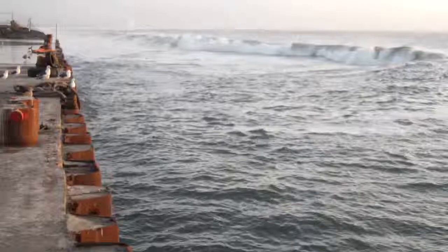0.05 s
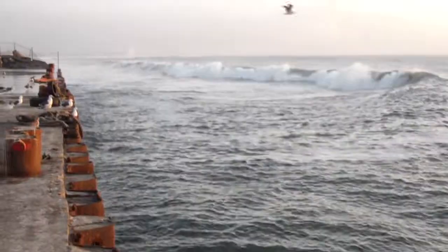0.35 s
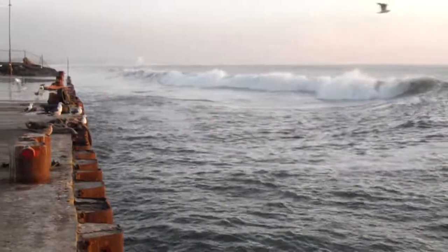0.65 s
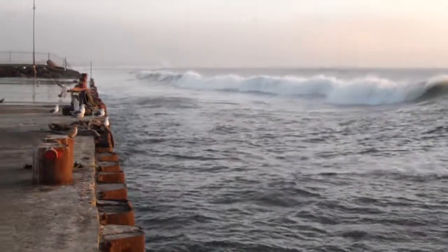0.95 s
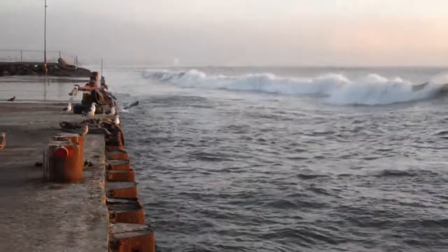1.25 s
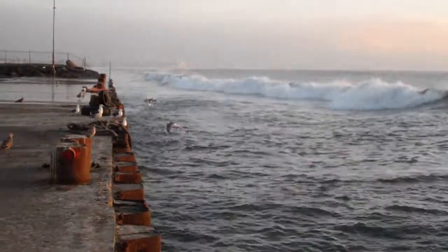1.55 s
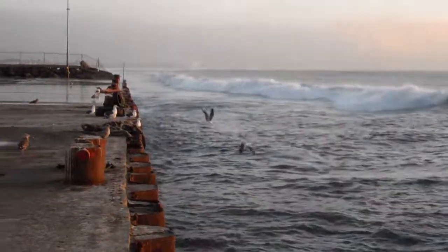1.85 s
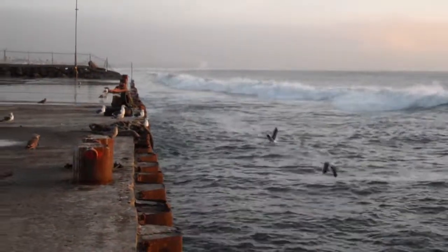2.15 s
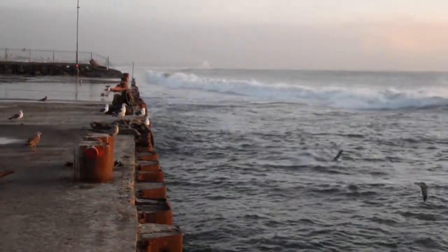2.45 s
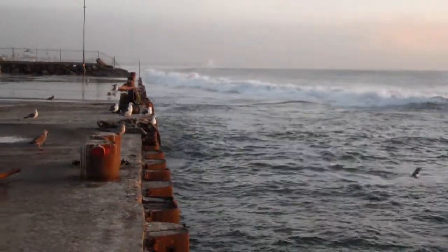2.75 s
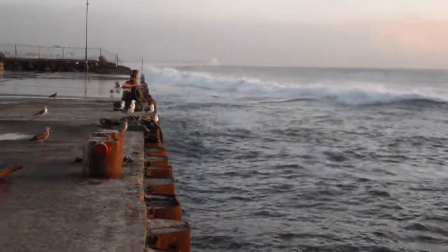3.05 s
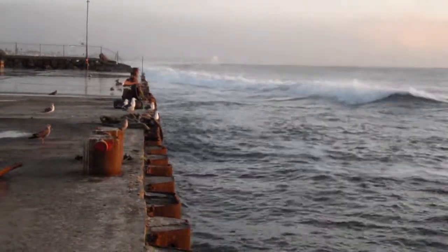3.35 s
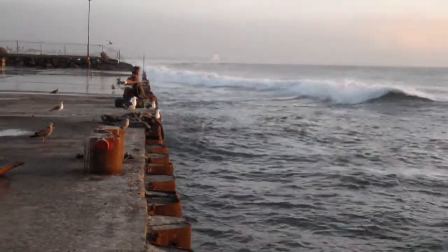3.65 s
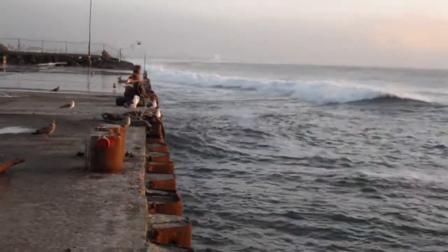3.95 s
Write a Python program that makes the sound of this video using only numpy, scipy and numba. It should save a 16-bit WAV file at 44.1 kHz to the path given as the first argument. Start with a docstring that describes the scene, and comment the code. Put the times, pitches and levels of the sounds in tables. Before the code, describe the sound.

Strong wind hits the microphone in quick, irregular gusts, rumbling and crackling on the right and duller on the left. Distant surf washes continuously underneath, heard from an open pier.

```python
"""A pier over a rough sea, with gusty wind buffeting a two-port microphone.
Distant breakers and foam merge into one wide wash. The sheltered left port mostly rumbles.
The wind hits the right port hard: eddies thump, its hollow booms,
and in strong gusts the flow tears into a crackle and a rasp."""
import sys
import numpy as np
from scipy import signal
from scipy.fft import rfft, irfft
from scipy.io import wavfile
from scipy.ndimage import uniform_filter1d, minimum_filter1d
from numba import njit

SR = 44100
rng = np.random.default_rng(int(sys.argv[2]) if len(sys.argv) > 2 else 0)


def waveform_to_disk(signal):
    """Save audio, clipped to [-1, 1], as 16-bit WAV at the path in sys.argv[1]."""
    frames = np.transpose(np.atleast_2d(signal))
    scaled = np.clip(frames, -1, 1) * 32767
    samples = np.round(scaled).astype(np.int16)
    wavfile.write(sys.argv[1], SR, samples)


N = 176400

# Sea wash. Each row: time in seconds, relative level in dB.
SEA_LEVEL_DB = [(0.12, -53), (0.16, -54.5), (0.34, -53.5), (0.5, -55), (0.6, -58), (1.25, -54.5),
                (1.33, -52.5), (1.53, -51.5), (1.65, -50.5), (1.88, -52.5), (1.96, -52.5), (2.03, -56.5),
                (2.2, -54.5), (2.42, -51.5), (2.63, -53), (2.81, -52.5), (2.86, -56.5), (3.0, -58),
                (3.34, -59), (3.55, -55.5), (3.93, -53.5), (4.0, -50.5)]
# Sea spectrum and its lift at the right port. Each row: frequency in Hz, gain in dB.
SEA_SPECTRUM_DB = [(40, 12.5), (200, 6.5), (500, 0), (750, 4), (1200, -1.5), (2200, -3), (3500, -5),
                   (5000, -8.5), (6200, -10), (7200, -14.5), (8600, -20), (9700, -28.5), (11500, -39)]
SEA_RIGHT_LIFT_DB = [(200, 0.86), (1000, 5.5), (2200, 6.5), (3500, 9.28), (4600, 7.48), (6400, -1),
                     (8000, 1.66), (11000, -1)]
# Sea likeness between ports. Each row: frequency in Hz, coherence from 0 to 1.
SEA_COHERENCE = [(100, 1), (2000, 0.93), (4000, 0.89), (6000, 0.67), (9000, 0.48)]
# Wind on the left port. Each row: time in seconds, relative level in dB.
LEE_GUST_DB = [(0.12, -33), (0.195, -43), (0.36, -24.5), (0.495, -27.5), (0.525, -18.5), (0.585, -39),
               (0.69, -27.5), (0.765, -38), (0.81, -25.5), (0.945, -37), (1.005, -23), (1.02, -31),
               (1.14, -23), (1.185, -30), (1.365, -35), (1.395, -49), (1.56, -26.5), (1.8, -42),
               (2.01, -30), (2.055, -60), (2.1, -30), (2.145, -40), (2.295, -35.5), (2.52, -32),
               (2.61, -50), (2.685, -27), (2.745, -37.0), (2.865, -30), (3.105, -41), (3.27, -25),
               (3.285, -38.5), (3.675, -34.5), (3.72, -44), (3.995, -37.5)]
# Gusts, deep rumble and tearing treble on the right port. Each row: time in seconds, relative level in dB.
GUST_DB = [(0.12, -22.5), (0.405, -17.5), (0.422, -27), (0.46, -19.5), (0.525, -17), (0.555, -20),
           (0.6, -19), (0.645, -16.5), (0.765, -21.5), (0.885, -17.5), (0.96, -25.5), (0.98, -18),
           (1.155, -19), (1.185, -22.5), (1.235, -26), (1.285, -30), (1.305, -18), (1.335, -23.5),
           (1.365, -14.5), (1.39, -24.5), (1.43, -21), (1.485, -31.5), (1.53, -35.5), (1.548, -21),
           (1.59, -25), (1.625, -32), (1.665, -16.5), (1.7, -16.5), (1.72, -30), (1.785, -32),
           (1.815, -17.5), (1.83, -22.5), (1.845, -40.5), (1.915, -36.5), (1.935, -22), (1.98, -14.5),
           (2.01, -18.5), (2.03, -21), (2.045, -32), (2.075, -31), (2.1, -22.5), (2.175, -33),
           (2.19, -28.5), (2.325, -28), (2.34, -20.5), (2.38, -18.5), (2.405, -32.5), (2.44, -34),
           (2.495, -21.5), (2.525, -29.5), (2.605, -24), (2.65, -33), (2.795, -28), (2.83, -15.5),
           (2.895, -24.5), (2.93, -24.5), (2.98, -18), (3.0, -23.5), (3.06, -28.5), (3.075, -20.5),
           (3.145, -26), (3.175, -19.5), (3.195, -22), (3.225, -17), (3.28, -22), (3.31, -23.5),
           (3.36, -17.5), (3.41, -24), (3.445, -21), (3.53, -17.5), (3.572, -35.5), (3.583, -24),
           (3.603, -26.5), (3.612, -37), (3.625, -27), (3.655, -28.5), (3.667, -39.5), (3.695, -36.5),
           (3.735, -21), (3.81, -19.5), (3.855, -21.5), (3.955, -21.5), (3.99, -19)]
RUMBLE_LEVEL_DB = [(0.12, -37), (0.36, -40), (1.32, -29.5), (1.365, -22.5), (1.485, -31), (2.145, -24.5),
                   (2.265, -42), (2.415, -26.5), (2.46, -37), (2.61, -24), (2.685, -34), (3.135, -22),
                   (3.405, -34.5), (3.995, -24.5)]
TEAR_DB = [(0.12, -12.5), (0.54, -12.5), (0.8, -9.5), (1.035, -8), (1.16, -9.5), (1.19, -15.5), (1.3, -12),
           (1.67, -14.5), (1.77, -26), (1.875, -7.5), (1.92, -16.5), (2.37, -17.5), (2.7, -15), (2.79, -18),
           (2.895, -13.5), (2.98, -16.5), (3.1, -20.5), (3.17, -25.5), (3.3, -14), (3.42, -22.5),
           (3.535, -14.5), (3.59, -18), (3.65, -7), (3.75, -22), (3.9, -18), (3.995, -31.5)]
# Spectra of the wind layers. Each row: frequency in Hz, relative density in dB.
LEE_SPECTRUM_DB = [(15, -8.5), (45, 5.5), (90, 5), (160, 2.5), (280, -7), (500, -10.5), (900, -32.5),
                   (2000, -48.5), (5000, -64)]
RUMBLE_SPECTRUM_DB = [(12, -8), (30, -5.5), (55, 1), (100, 9.5), (170, 10), (350, -24), (1000, -70)]
BUFFET_SPECTRUM_DB = [(20, -22), (60, -8.5), (120, -4), (190, 1.5), (290, -2.5), (430, -3.5), (600, -8.5),
                      (850, -15.5), (1400, -23.5), (2500, -53), (5000, -81)]
CRACKLE_SPECTRUM_DB = [(100, -7.5), (400, 4.5), (800, 5), (1200, 3), (1700, 1.5), (2300, -6.5), (3000, -16),
                       (4500, -28.5), (8000, -86.5)]
RASP_SPECTRUM_DB = [(500, -27.5), (1100, -3), (1800, 3), (2400, 0.5), (3000, -8.5), (5000, -51)]
# Resonance of the right port's hollow. Each row: time in seconds, pitch in Hz, width per stage in Hz.
HOLLOW_HZ = [(0.12, 356, 200), (0.3, 291, 242), (0.52, 303, 109), (0.72, 321, 150), (0.88, 379, 238),
             (1.07, 331, 160), (1.16, 234, 139.6), (1.37, 265, 130), (1.57, 323, 220), (1.82, 235, 179),
             (2.0, 213, 199), (2.25, 219, 240), (2.37, 359, 110), (2.5, 250, 198), (2.83, 327, 218),
             (2.97, 220, 160), (3.16, 188, 90), (3.24, 267, 70), (3.39, 315, 129.5), (3.55, 249, 202),
             (3.8, 225, 180), (3.92, 253, 180), (3.99, 266, 50.3)]
# Big eddies on the right port. Each row: centre time in seconds, thump gain in dB, rip level in dB.
SLAP_EVENTS = [(0.390, -4, -28), (0.52, -3, -32), (0.838, -7.5, -27), (1.073, -8, -20), (1.353, -5, -25),
               (1.365, -6, -18.5), (1.448, -22, -23), (1.666, -7, -28), (1.829, -25, -24.5),
               (1.988, -26, -26), (2.09, -9, -37), (2.823, -2.5, -25), (2.955, -10, -28), (2.981, -7, -25),
               (3.071, -6, -31), (3.181, -6, -37), (3.447, -6, -26.5), (3.814, -4, -29)]

SEA_DB, SEA_PATCH_DB, SEA_FLICKER_DB = 12, 0.6, 0.56
LEE_DB, LEE_FLUTTER_DB = -4, -2
LEE_REF_DB, LEE_BUFFET_DB, LEE_GROWTH = -19.5, -16, 1.5
RUMBLE_DB, RUMBLE_SWELL_DB = -1.5, 1
GUST_REF_DB, TEAR_REF_DB = -27.5, -13.5
FLUTTER_HZ, GRAIN_HZ = 72, 350
HOLLOW_DB, HOLLOW_STEADINESS, LOCK_DB_PER_HZ, WIDTH_REF_HZ = -2, 0.69, 0.01, 197
EDDIES_PER_S, EDDY_S, EDDY_DB = 23, 0.00065, 4.5
SLAP_S, RIP_S = 0.00067, 0.0029
CRACKLE_DB, CRACKLE_FLUTTER_DB, CRACKLE_GRAIN_DB, CRACKLE_GROWTH = 2, 5.5, 7, 1.008
SPURT_LOSS_PER_DB = .04
RASP_DB, RASP_GROWTH, RASP_FLUTTER_DB = -23.5, 1.4, 3.5
BUFFET_DB, BUFFET_FLUTTER_DB = 1, 2.6
START_S, CEILING, CUTOFF_HZ = .108, .75, 11900


def amp(db):
    """Decibels to gain."""
    return 10 ** (np.asarray(db) / 20)


def unit(x):
    """Scales to rms 1."""
    return x / np.sqrt(np.mean(x ** 2) + 1e-20)


def at_hz(rows, hz):
    """Reads a spectrum on a log-frequency axis."""
    row_hz, value = np.transpose(rows)
    return np.interp(np.log(hz + 1), np.log(row_hz + 1), value)


def curve(rows, column=-1):
    """Reads one column of a time table at every sample."""
    rows = np.asarray(rows)
    return np.interp(np.arange(N) / SR, rows[:, 0], rows[:, column])


def wander(low_hz, high_hz):
    """Random motion between two rates, soft-limited to +-2."""
    hz = np.fft.rfftfreq(N, 1 / SR)
    band = hz / (hz + low_hz) / (1 + (hz / high_hz) ** 2)
    motion = unit(irfft(rfft(rng.standard_normal(N)) * band, N))
    return 2 * np.tanh(motion / 2)


def sea():
    """Distant breakers and foam: a wash with drifting patches, much alike at both ports."""
    frames, hz = N // 256 + 5, np.fft.rfftfreq(1024, 1 / SR)
    left_re, left_im, own_re, own_im, patches = rng.standard_normal((frames, 513, 5)).T
    patches = uniform_filter1d(patches, size=16, axis=0)  # across frequency
    patches = unit(uniform_filter1d(patches, size=14, axis=1))  # across time
    coherence = np.clip(at_hz(SEA_COHERENCE, hz), 0, 1)[:, None]
    left = left_re + 1j * left_im
    right = coherence * left + np.sqrt(1 - coherence ** 2) * (own_re + 1j * own_im)
    right *= amp(at_hz(SEA_RIGHT_LIFT_DB, hz))[:, None]
    spectra = np.array([left, right]) * amp(at_hz(SEA_SPECTRUM_DB, hz)[:, None] + SEA_PATCH_DB * patches)
    wash = signal.istft(spectra, nperseg=1024, noverlap=768)[1][:, :N]
    level_db = SEA_DB + curve(SEA_LEVEL_DB) + SEA_FLICKER_DB * wander(4.6, 60)
    return wash / wash[0].std() * amp(level_db)


def turbulence(spectrum_db, flutter_db):
    """Pressure noise in spurts, coloured by the port, at rms 1."""
    spurts = rng.standard_normal(N) * amp(flutter_db)
    colour = amp(at_hz(spectrum_db, np.fft.rfftfreq(N, 1 / SR)))
    return unit(irfft(rfft(spurts) * colour, N))


def leeward_wind():
    """Dull rumble on the sheltered port; buffeting grows in its strongest gusts."""
    gust_db, flutter_db = curve(LEE_GUST_DB), LEE_FLUTTER_DB * wander(10, FLUTTER_HZ)
    buffet_db = LEE_REF_DB + LEE_GROWTH * (gust_db - LEE_REF_DB) + LEE_BUFFET_DB
    dull = amp(gust_db + LEE_DB) * turbulence(LEE_SPECTRUM_DB, flutter_db)
    return dull + amp(buffet_db) * turbulence(BUFFET_SPECTRUM_DB, flutter_db)


def rumble():
    """Deep, slowly swelling turbulence on the right port."""
    swell_db = RUMBLE_SWELL_DB * wander(2, 9.1)
    return amp(curve(RUMBLE_LEVEL_DB) + RUMBLE_DB) * turbulence(RUMBLE_SPECTRUM_DB, swell_db)


@njit
def smooth(x, memory):
    """One-pole low-pass with time-varying memory."""
    out = np.zeros_like(x)
    for i in range(1, len(x)):
        out[i] = memory[i] * out[i - 1] + (1 - memory[i]) * x[i]
    return out


def resonate(x, pitch_hz, width_hz):
    """Resonator with moving pitch and width."""
    carrier = np.exp(2j * np.pi * np.cumsum(pitch_hz) / SR)
    return 2 * (carrier * smooth(x / carrier, np.exp(-np.pi * width_hz / SR))).real


def hollow():
    """The port's hollow booms; where the flow locks on, the boom is narrower and fuller."""
    pitch_hz, width_hz = curve(HOLLOW_HZ, column=1), np.maximum(curve(HOLLOW_HZ), 20)
    first_stage = resonate(rng.standard_normal(N), pitch_hz, width_hz)
    boom = unit(resonate(first_stage, pitch_hz, width_hz) / np.sqrt(width_hz))
    envelope = abs(signal.hilbert(boom))
    steadied = unit(boom / (envelope + 0.056) ** HOLLOW_STEADINESS)
    return steadied * amp(LOCK_DB_PER_HZ * (WIDTH_REF_HZ - width_hz))


def vortex(u):
    """Pressure of a passing vortex: a quick push, then suction. u is time over its time scale."""
    return -(u + .5 * (1 - u ** 2)) * np.exp(-u ** 2 / 2)


def eddies():
    """Small vortices cross the port at random."""
    out, t = np.zeros(N), np.arange(N) / SR
    for position, size, strength in rng.random((int(EDDIES_PER_S * N / SR), 3)):
        near = slice(int(position * N), int(position * N) + SR // 50)
        offset_s = t[near] - position * N / SR - .01
        out[near] += (.5 + strength) * vortex(offset_s / (EDDY_S * (.5 + size)))
    return out


def slaps():
    """The biggest vortices thump, each with a brief rip of noise."""
    out, t, noise = np.zeros(N), np.arange(N) / SR, turbulence(CRACKLE_SPECTRUM_DB, flutter_db=0)
    for centre_s, thump_db, rip_db in SLAP_EVENTS:
        near = abs(t - centre_s) < .02
        offset_s = t[near] - centre_s
        rip = noise[near] * np.exp(-(offset_s / RIP_S) ** 2 / 2)
        out[near] += amp(thump_db) * vortex(offset_s / SLAP_S) + amp(rip_db) * rip
    return out


def crackle(gust_db, tear_db, flutter):
    """Tearing flow crackles in spurts, which merge as it tears more."""
    depth = np.clip(1 - SPURT_LOSS_PER_DB * (tear_db - TEAR_REF_DB), .4, 1.2)
    spurt_db = depth * (CRACKLE_FLUTTER_DB * flutter + CRACKLE_GRAIN_DB * wander(50, GRAIN_HZ))
    level_db = GUST_REF_DB + CRACKLE_GROWTH * (gust_db - GUST_REF_DB) + tear_db + CRACKLE_DB
    return amp(level_db) * turbulence(CRACKLE_SPECTRUM_DB, spurt_db)


def windward_wind():
    """Gusts drive buffeting, boom, eddies and crackle; fully torn flow rasps. Rumble and slaps add on."""
    gust_db, tear_db, flutter = curve(GUST_DB), curve(TEAR_DB), wander(33, FLUTTER_HZ)
    buffet = amp(BUFFET_DB) * turbulence(BUFFET_SPECTRUM_DB, BUFFET_FLUTTER_DB * flutter)
    rasp_db = RASP_DB + RASP_GROWTH * (tear_db - TEAR_REF_DB)
    rasp = amp(rasp_db) * turbulence(RASP_SPECTRUM_DB, RASP_FLUTTER_DB * flutter)
    body = amp(gust_db) * (buffet + amp(HOLLOW_DB) * hollow() + amp(EDDY_DB) * eddies() + rasp)
    return body + crackle(gust_db, tear_db, flutter) + rumble() + slaps()


def scene():
    """Sea at both ports, separate wind on each."""
    return sea() + np.array([leeward_wind(), windward_wind()])


def record(dry):
    """Brief silence, then sound through a peak limiter and a low-pass."""
    t = np.arange(N) / SR
    gate = np.clip(np.minimum(t - START_S, t[-1] - t) / .003, 0, 1)
    max_gain = np.minimum(1, CEILING / (abs(dry) + 1e-9))
    gain = uniform_filter1d(minimum_filter1d(max_gain, size=301, axis=1), size=301, axis=1)
    lowpass = signal.firwin(511, CUTOFF_HZ, window=("kaiser", 9), fs=SR)
    return signal.oaconvolve(dry * gain * gate, lowpass[None], "same")


dry = scene()
out = record(dry)
waveform_to_disk(out)
```